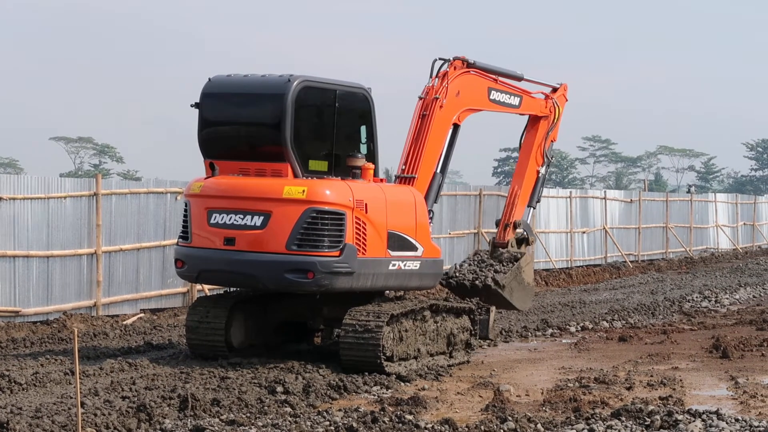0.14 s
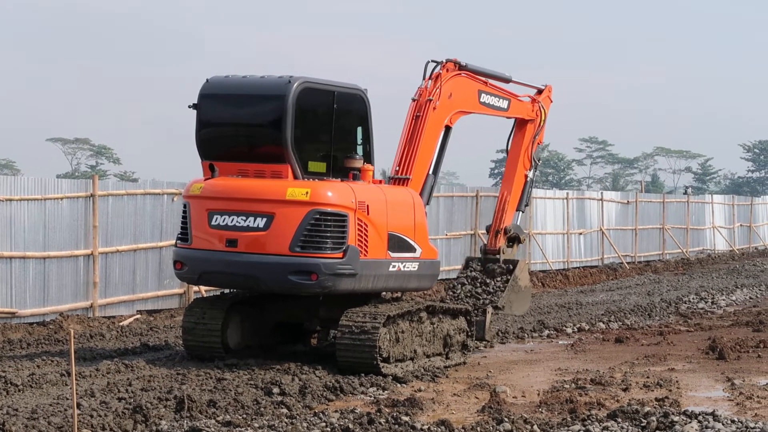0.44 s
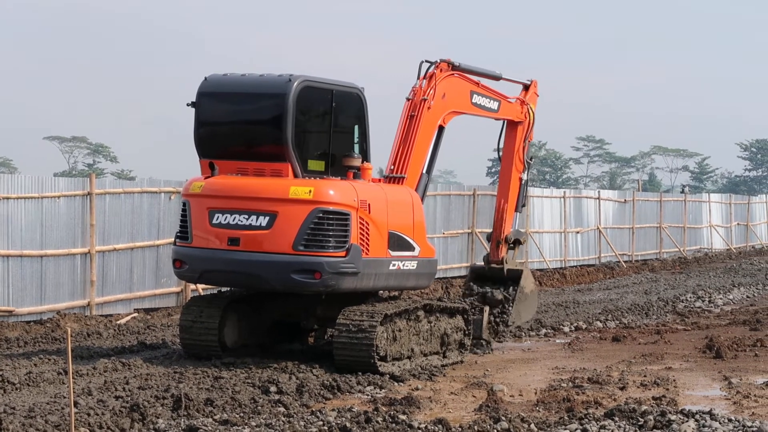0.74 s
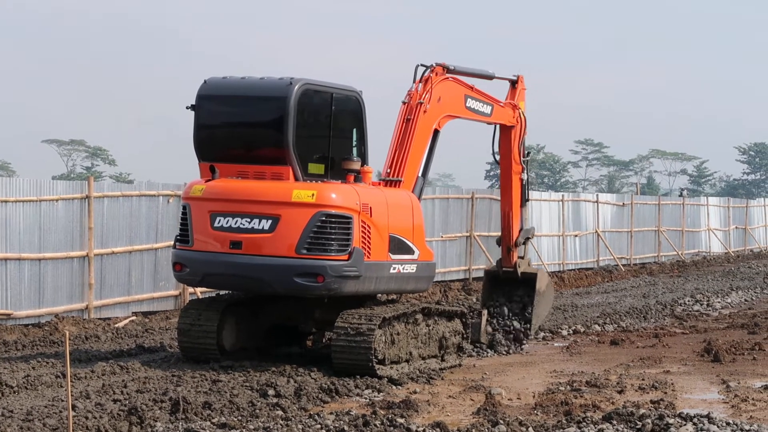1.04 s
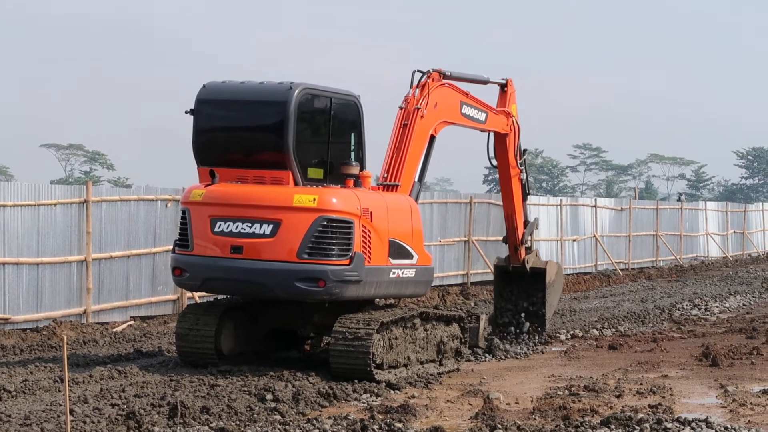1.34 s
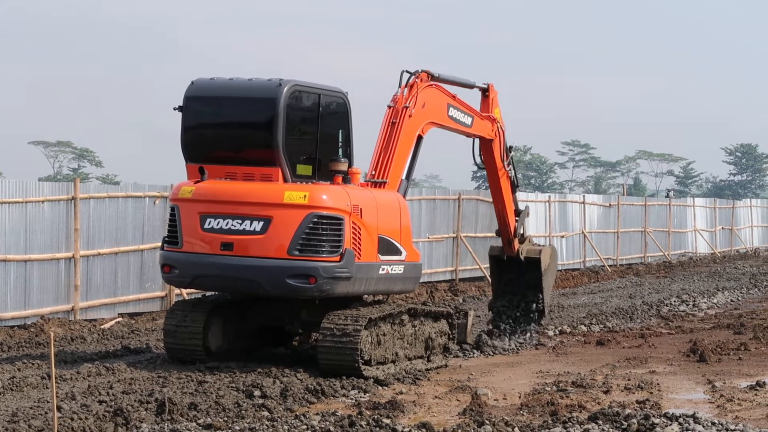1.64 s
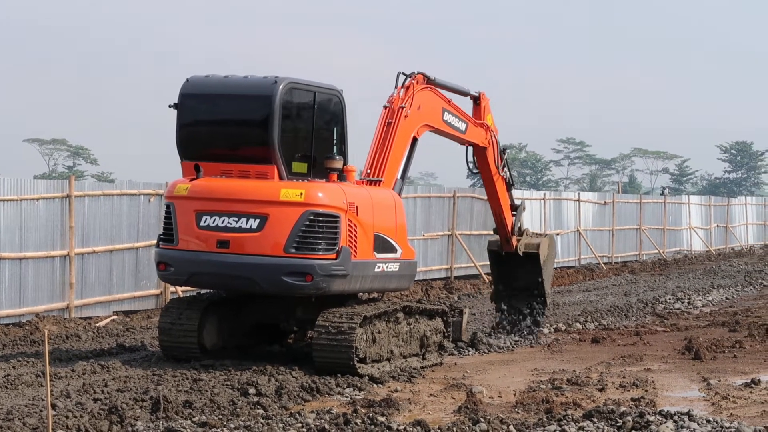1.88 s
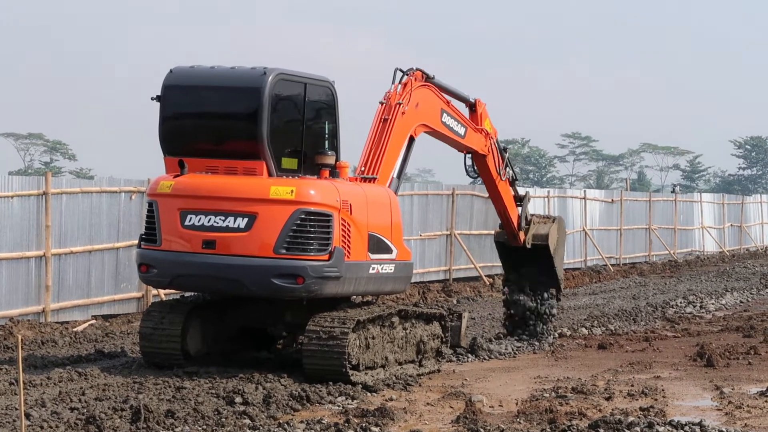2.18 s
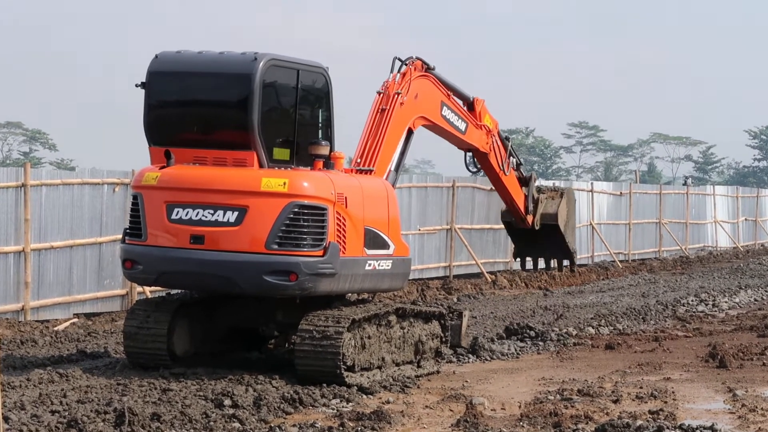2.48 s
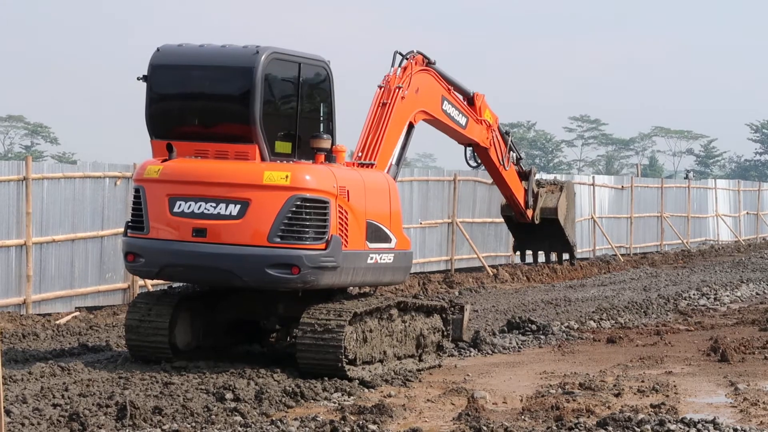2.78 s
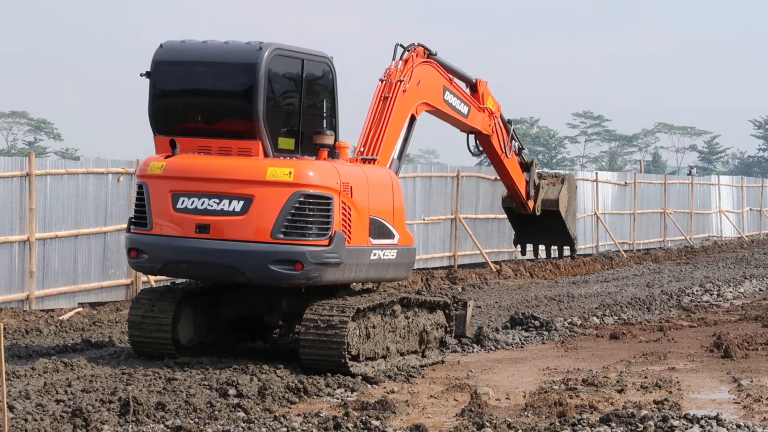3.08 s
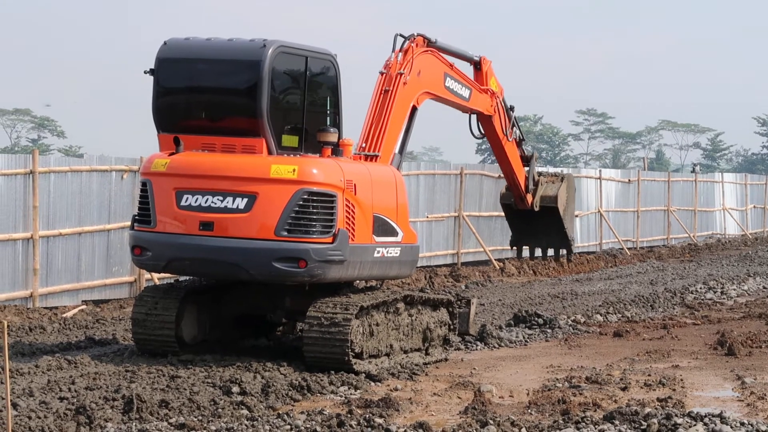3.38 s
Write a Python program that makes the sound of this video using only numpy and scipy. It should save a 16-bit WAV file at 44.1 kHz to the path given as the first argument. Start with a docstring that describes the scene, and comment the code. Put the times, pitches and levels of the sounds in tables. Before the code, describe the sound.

Steady diesel digger engine on open muddy ground, heard from some metres away in stereo; revs dip and harden while clods patter and smack down, then the engine eases and picks up again.

```python
"""A small excavator's four-cylinder diesel drones on a muddy site, some metres from two close microphones.
Crank-locked lines make the exhaust beat; hydraulic load pulls the revs down and hardens it.
Noise bursts that partly repeat every four firings make the block knock, rasp and clatter.
Wet soil leaves the bucket as splats of tiny ringing grains, with a big slap and single smacks of
noise; crumbs patter from sparser grains."""
import sys
import numpy as np
from scipy import signal
from scipy.fft import rfft, irfft
from scipy.io import wavfile
from scipy.ndimage import uniform_filter1d, map_coordinates

SR = 44100
rng = np.random.default_rng(int(sys.argv[2]) if len(sys.argv) > 2 else 0)


def unload_audio(sound):
    """Save the sound as a 16-bit wav file, at the path given as the first command line argument."""
    columns = np.transpose(np.atleast_2d(sound))
    # keep every value between -1 and 1, then stretch to whole-number steps
    steps = np.round(np.clip(columns, -1, 1) * 32767)
    wavfile.write(sys.argv[1], SR, steps.astype(np.int16))


N = 155232


def undb(db):
    """Decibels to amplitude gain."""
    return 10 ** (np.asarray(db) / 20)


def unit(x):
    """Scale to rms 1."""
    return x / np.sqrt(np.mean(x ** 2) + 1e-18)


def curve(rows, axis=1):
    """One column of a time table, in straight lines, at every sample."""
    rows = np.array(rows)
    return np.interp(np.arange(N) / SR, rows[:, 0], rows[:, axis])


def gains(points, size):
    """Gain of a spectrum table at each bin of a transform, interpolated along log frequency."""
    hz, db = np.array(points).T
    bins_hz = np.arange(size // 2 + 1) * SR / size
    return undb(np.interp(np.log(bins_hz + 1), np.log(hz), db))


def colour(x, points):
    """Filter a sound by a spectrum table."""
    return irfft(rfft(x) * gains(points, len(x)), len(x))


def coloured_noise(points, size=N):
    """Steady noise with the table's spectral shape and rms 1."""
    return unit(colour(rng.standard_normal(size), points))


def walk(steps_per_s):
    """Smooth random wander of rms near 1: random steps averaged twice."""
    hold = int(SR / steps_per_s)
    steps = np.repeat(rng.standard_normal(N // hold + 1), hold)
    return unit(uniform_filter1d(uniform_filter1d(steps, hold), hold)[:N])


# Spread between the two microphones: frequency_hz, side_minus_mid_db
MIC_SPREAD = [(60, -42), (170, -25.5), (700, -22), (2800, -12), (9000, -.5), (14000, 0)]


def stereo(mid, side):
    """Two close microphones: nearly alike in the bass, far less so in the treble."""
    return mid + colour(side, MIC_SPREAD) * np.array([[1], [-1]])


# Hydraulic load on the engine: time_s, load_share (0 to 1)
HYDRAULIC_LOAD = [(0, .35), (.22, .45), (.38, .21), (.72, .16), (.97, 1), (2.52, .98), (2.82, 0),
                  (3.18, .36), (3.5, .37)]
FREE_HZ, SAG_HZ = 74.95, 2.9  # firings per second running free, and their drop under full load
SPEED_JITTER = .0016  # rms share of the firing rate


def crankshaft():
    """Load slows the crank; its jittering speed adds up to a running count of firings."""
    load = curve(HYDRAULIC_LOAD)
    rate = FREE_HZ - SAG_HZ * load
    firings = np.cumsum(rate * (1 + SPEED_JITTER * walk(25))) / SR
    return load, rate, firings


# Exhaust fundamental: time_s, level_db
BEAT_LEVEL = [(0, -16.5), (.2, -16.5), (.5, -20), (.95, -16.5), (1.75, -17), (2.5, -17), (2.88, -25.5),
              (3.15, -20), (3.5, -16.5)]
# Hum that swells as the bucket tips: time_s, level_db
HUM_LEVEL = [(0, -56), (1.7, -34.5), (2.05, -28.5), (2.35, -31), (2.7, -49), (3.5, -39)]
# Higher exhaust lines: multiple_of_firing_rate, free_level_db, loaded_level_db
EXHAUST = [(2, -27, -23.5), (3, -28.5, -20.5), (4, -43, -36.5), (5, -29.5, -39)]
# Weaker engine tones: low wavering drones, perhaps the fan, and higher lines between and on the
# firing harmonics: multiple_of_firing_rate, free_level_db, loaded_level_db
ENGINE_TONES = [(.7, -31.5, -36.5), (1.46, -23.5, -29), (2.5, -39, -40), (3.51, -26, -32),
                (3.75, -46, -35.5), (8, -50, -46), (8.5, -42, -47), (9.5, -40.5, -50.5), (12.5, -51, -45),
                (17.5, -49, -46), (19, -47, -45)]
HUM_ORDER = 4.36  # multiple of the firing rate
BEAT_WAVER_DB, TONE_WAVER_DB = 1.1, 3.2  # rms
SMEAR_RAD = 1.178  # scales the phase lag between exhaust lines running free: softer beats


def drone(firings, load):
    """Exhaust beats that peak harder under load, with weaker wavering tones, all following the revs."""
    turn = 2 * np.pi * firings
    out = undb(curve(BEAT_LEVEL) + BEAT_WAVER_DB * walk(24)) * np.cos(turn)
    out = out + undb(curve(HUM_LEVEL)) * np.cos(HUM_ORDER * turn)
    for k, free, loaded in EXHAUST:
        level_db = free + (loaded - free) * load + BEAT_WAVER_DB * walk(22)
        lag = SMEAR_RAD * (1 - load) * (k - 1) ** 2
        out = out + undb(level_db) * np.cos(k * turn - lag)
    for k, free, loaded in ENGINE_TONES:
        level_db = free + (loaded - free) * load + TONE_WAVER_DB * walk(12)
        out = out + undb(level_db) * np.cos(k * turn + 2 * np.pi * rng.random())
    return np.sqrt(2) * out  # line levels are rms


# Low rumble: time_s, level_db
RUMBLE_LEVEL = [(0, -22.5), (.7, -23), (1.1, -26), (2.5, -25), (2.8, -25.5), (3.05, -22.5), (3.5, -19)]
# Its spectrum: frequency_hz, relative_density_db
RUMBLE = [(15, -39), (30, -17), (48, -6), (70, -7.5), (115, -2.5), (160, -4.5), (260, -10.5), (340, -14),
          (450, -24), (900, -58)]


def rumble():
    """Low noise under the drone, following its own level."""
    return undb(curve(RUMBLE_LEVEL)) * coloured_noise(RUMBLE)


FIRING_DEPTH, TURN_DEPTH = 0.059, 0.11  # swell with each firing and each crank turn, in log gain
RATTLE_WAVER_DB = 1.1  # rms


def rattle(firings, spectrum, repeat):
    """Block noise, a share of its power repeating every four firings, that swells with the crank."""
    size = 4 * int(SR / 75)  # samples in the repeated cycle
    cycle = coloured_noise(spectrum, size)
    locked = map_coordinates(cycle, [firings / 4 % 1 * size], mode="grid-wrap")
    loose, side = coloured_noise(spectrum), coloured_noise(spectrum)
    mid = np.sqrt(repeat) * locked + np.sqrt(1 - repeat) * loose
    firing_swell = FIRING_DEPTH * np.cos(2 * np.pi * firings)
    turn_swell = TURN_DEPTH * np.cos(np.pi * firings)  # two firings a turn
    gate = unit(np.exp(firing_swell + turn_swell))
    return gate * undb(RATTLE_WAVER_DB * walk(18)) * stereo(mid, side)


# Knock of the block: time_s, level_db
KNOCK_LEVEL = [(0, -29.5), (.85, -28.5), (1.05, -32.5), (2.25, -34), (2.37, -31.5), (2.5, -35),
               (3.1, -29.5), (3.5, -29)]
# Its spectrum: frequency_hz, relative_density_db
KNOCK = [(150, -38), (330, -3.5), (420, -5), (520, -7.5), (660, .5), (900, -1.5), (1010, -9.5), (3000, -51)]
KNOCK_REPEAT = 0.41  # repeating share of the power, for knock and rasp


def knock(firings):
    """The block's dull knock, strongest in the middle of the range."""
    return undb(curve(KNOCK_LEVEL)) * rattle(firings, KNOCK, KNOCK_REPEAT)


# Rasp of the engine cover: time_s, level_db
RASP_LEVEL = [(0, -35.5), (.85, -36.5), (1.1, -38.5), (2.7, -39), (3.4, -34)]
# Its spectrum: frequency_hz, relative_density_db
RASP = [(300, -62), (950, -16.5), (1150, 0.5), (1420, -1.5), (1540, -11.5), (3000, -74)]


def rasp(firings):
    """The engine cover rasps in a narrow band, in step with the block."""
    return undb(curve(RASP_LEVEL)) * rattle(firings, RASP, KNOCK_REPEAT)


# Valve and injector clatter: time_s, level_db
CLATTER_LEVEL = [(0, -34), (.85, -32.5), (1.3, -36), (2.7, -36.5), (3.27, -32), (3.5, -35)]
# Its spectrum: frequency_hz, relative_density_db
CLATTER = [(900, -10), (1500, -1), (1950, 5), (2400, -4), (3000, -0.5), (3400, -10.5), (3900, -9),
           (4400, -16.5), (6400, -20.5), (9000, -35), (13500, -45), (16000, -57)]


def clatter(firings):
    """Valves and injectors clatter brightly, more of it repeating than in the knock."""
    return undb(curve(CLATTER_LEVEL)) * rattle(firings, CLATTER, 0.57)


# Wavering whine, likely a ringing body panel: time_s, level_db
PANEL_LEVEL = [(0, -43), (1.2, -43), (2.3, -39.5), (3.0, -35.5), (3.5, -34.5)]
PANEL_HZ, PANEL_WIDTH_HZ, PANEL_WAVER_DB = 861, 31, 2


def panel(firings, rate):
    """A body panel rings with whichever crank harmonic lies near its resonance."""
    out = 0
    for k in np.arange(22, 26) / 2:  # multiples of the firing rate
        detune = 2 * (k * rate - PANEL_HZ) / PANEL_WIDTH_HZ
        response = 1 / np.hypot(1, detune ** 2)
        ring = np.cos(2 * np.pi * k * firings + walk(25) / np.pi)
        out = out + response * undb(PANEL_WAVER_DB * walk(20)) * ring
    return undb(curve(PANEL_LEVEL)) * unit(out)


PUMP_HZ, PUMP_DB, PUMP_FADE_DB_PER_S = 1928, -38.5, 21


def pump():
    """A thin hydraulic whine with a wandering phase that dies away."""
    t = np.arange(N) / SR
    whine = unit(np.sin(2 * np.pi * PUMP_HZ * t + walk(19)))
    return undb(PUMP_DB - PUMP_FADE_DB_PER_S * t) * whine


def engine():
    """The whole engine and its hydraulics; low and tonal parts are spread by a quarter-cycle side."""
    load, rate, firings = crankshaft()
    low = drone(firings, load) + rumble() + panel(firings, rate) + pump()
    quarter_cycle = np.imag(signal.hilbert(low))
    return stereo(low, quarter_cycle) + knock(firings) + rasp(firings) + clatter(firings)


GRAIN_Q = 4.6  # how long a grain rings: centre over width


def grains(grains_per_s, spread_db, spectrum, bands=28):
    """Tiny wet impacts of very unequal size, each ringing briefly at the pitch of its band."""
    out = 0
    for hz in np.linspace(600, 14000, bands):
        when, chance, size = rng.random((3, 2000))
        landed = chance < grains_per_s * N / SR / bands / len(when)
        sizes = undb(spread_db * np.minimum(-np.log(size), 5)) * landed
        taps = np.bincount((when * N).astype(int), sizes, N)
        b, a = signal.iirpeak(hz, GRAIN_Q, fs=SR)
        out = out + signal.lfilter(b, a, taps) / np.sqrt(hz)
    return unit(colour(out, spectrum))


# Pattering crumbs: time_s, level_db
CRUMB_LEVEL = [(0, -50), (.7, -51), (.88, -47), (1.3, -44), (1.65, -46.5), (2.05, -45), (2.45, -43),
               (2.65, -59), (3.5, -47.5)]
# Filter on their grains: frequency_hz, gain_db
CRUMB = [(1000, 1), (3000, 7.5), (5500, 0.5), (11000, -15), (14000, -26)]


def crumbs():
    """Crumbs patter down as a sparser stream of grains."""
    return undb(curve(CRUMB_LEVEL)) * grains(3500, 4, CRUMB)


# Clods landing: peak_s, level_db, rise_s, decay_s
SPLATS = [(.91, -36.5, 0.029, 0.0093), (1.082, -28, 0.019, 0.012), (1.127, -33.5, .004, 0.007),
          (1.69, -37, 0.043, .03), (1.91, -41, .053, 0.047), (2.022, -37, .0087, .023),
          (2.326, -29, 0.024, .019), (2.357, -26, 0.023, 0.013), (2.396, -28, 0.014, 0.021),
          (2.445, -36, 0.018, 0.086), (2.698, -36, .004, 0.016), (2.789, -36, 0.0054, 0.0073)]
# Filter on their grains: frequency_hz, gain_db
SPLAT = [(200, -19), (700, -4), (1300, 4.5), (1900, 5), (2700, 6), (3800, 7), (5000, -3.5), (7300, -8),
         (10000, -20), (14000, -28)]


def splats():
    """Clods splat: dense grains rise and die exponentially around each landing."""
    t = np.arange(N) / SR
    power = 0
    for peak, db, rise, decay in SPLATS:
        distance = np.maximum((peak - t) / rise, (t - peak) / decay)
        power = power + undb(2 * db) * np.exp(-2 * distance)
    return np.sqrt(power) * grains(12000, 3.5, SPLAT)


# Single wet smacks: start_s, level_db, centre_hz, decay_s
SMACKS = [(1.169, -39.5, 8700, .004), (1.454, -45, 7950, .002), (1.499, -39, 7300, .0035),
          (1.717, -28, 2480, 0.011), (2.357, -21, 3550, 0.0028), (2.361, -22, 1480, 0.003),
          (2.394, -21.5, 6900, 0.0011), (2.397, -23, 1390, .007), (2.574, -34.5, 3700, 0.0034)]
SMACK_OCTAVES = .42  # sets the width of each smack's band


def smacks():
    """Single lumps land: a sharp start and a short burst of noise around one pitch."""
    t = np.arange(N) / SR
    octaves = np.log2(np.arange(N // 2 + 1) * SR / N + 1)
    noise, out = rfft(rng.standard_normal(N)), 0
    for start, db, hz, decay in SMACKS:
        offset = (octaves - np.log2(hz)) / SMACK_OCTAVES
        spray = unit(irfft(noise / (1 + offset ** 2) ** 2, N))
        out = out + undb(db) * spray * (t >= start) * np.exp(-abs(t - start) / decay)
    return out


FENCE_DECAY_S, FENCE_DB = 0.012, -1.5


def fence(x):
    """Fence and ground smear a sound with a short decaying tail of noise."""
    t = np.arange(N) / SR
    tail = unit(rng.standard_normal(N) * np.exp(-t / FENCE_DECAY_S)) / np.sqrt(N)  # energy 1
    return undb(FENCE_DB) * signal.fftconvolve(x, tail)[:N]


def soil():
    """Splats and crumbs are smeared by fence and ground; single lumps smack through dry."""
    pair = []
    for _ in range(2):  # mid, then side
        falling = crumbs() + splats()
        pair.append(falling + fence(falling) + smacks())
    return stereo(*pair)


def scene():
    """The engine and the falling soil."""
    return engine() + soil()


def record(dry):
    """At the microphones a steep elliptic low-pass removes the treble above 14.7 kHz."""
    sections = signal.ellip(8, .2, 70, 14700, fs=SR, output="sos")  # ripple and stopband in dB
    return signal.sosfilt(sections, dry)


dry = scene()
out = record(dry)
unload_audio(out)
```